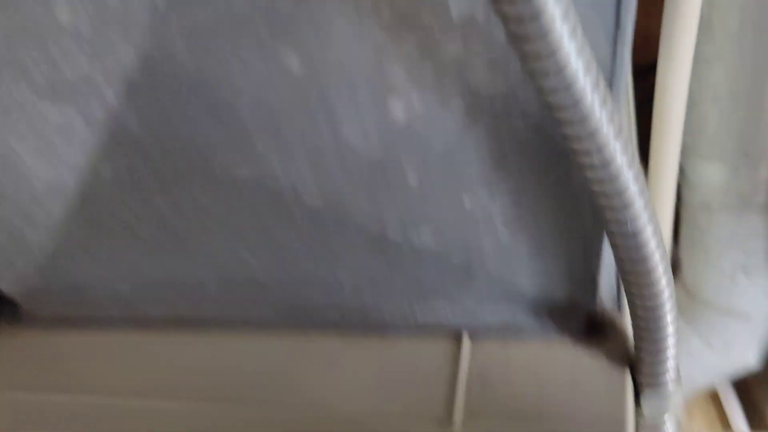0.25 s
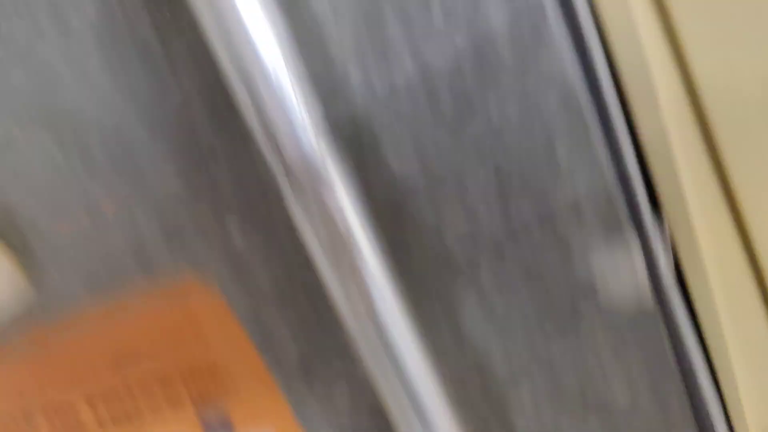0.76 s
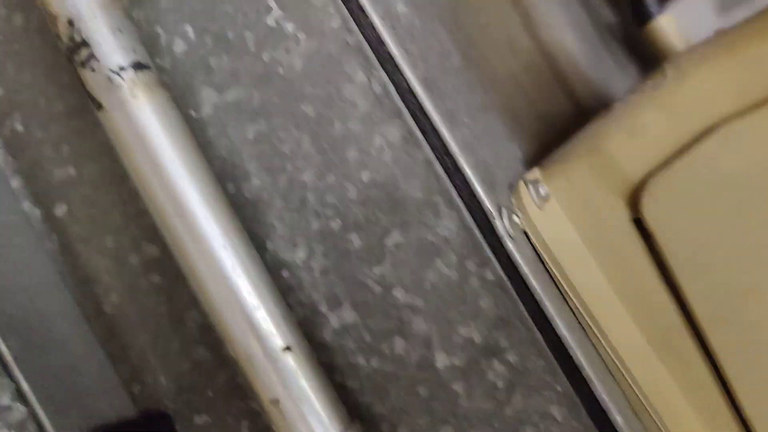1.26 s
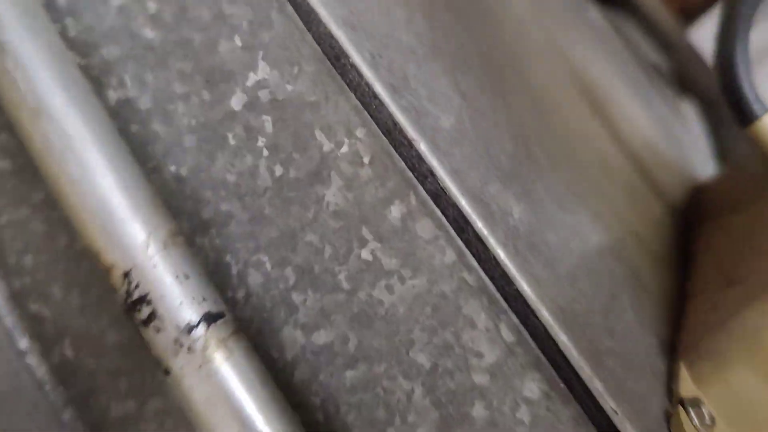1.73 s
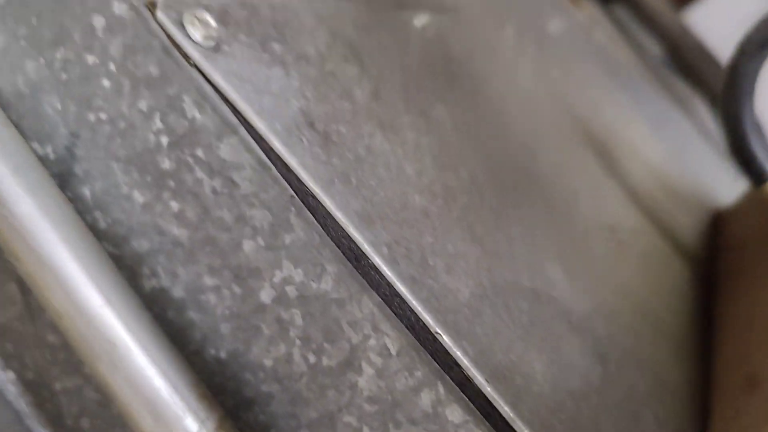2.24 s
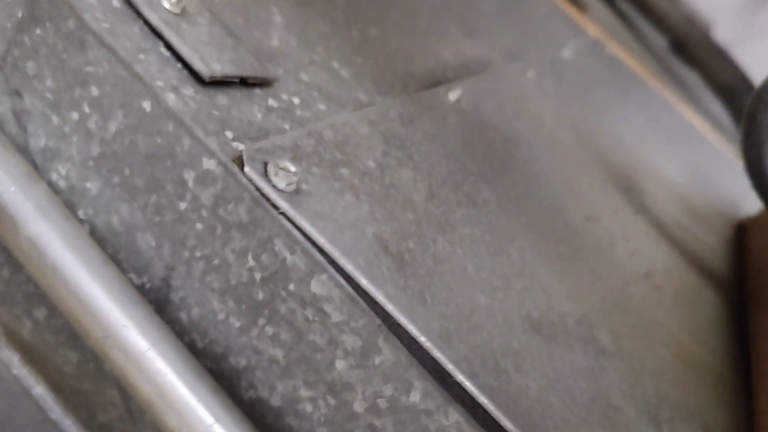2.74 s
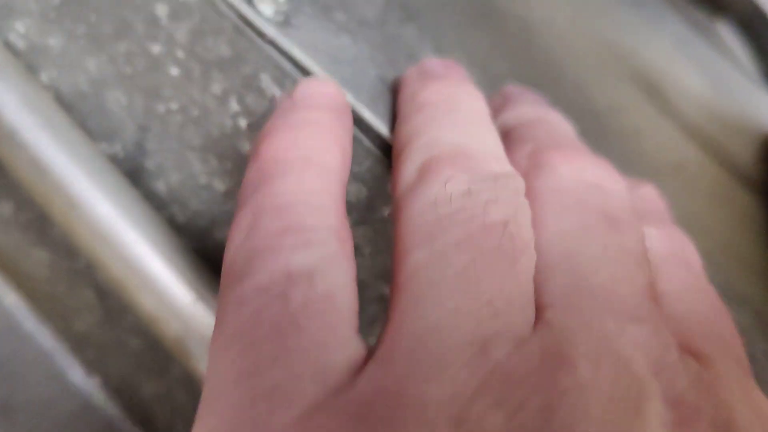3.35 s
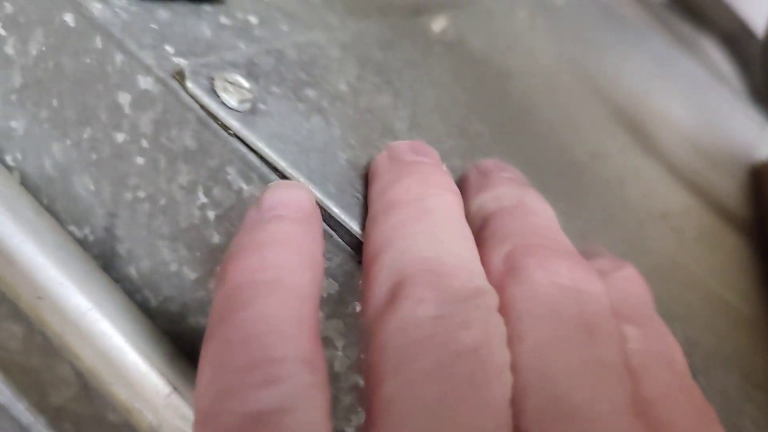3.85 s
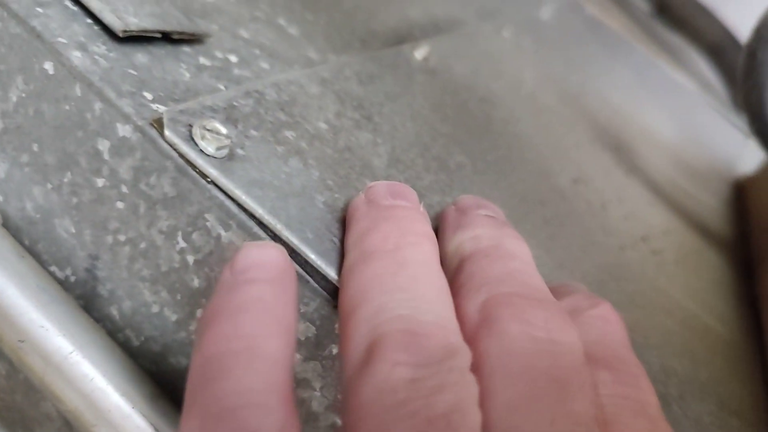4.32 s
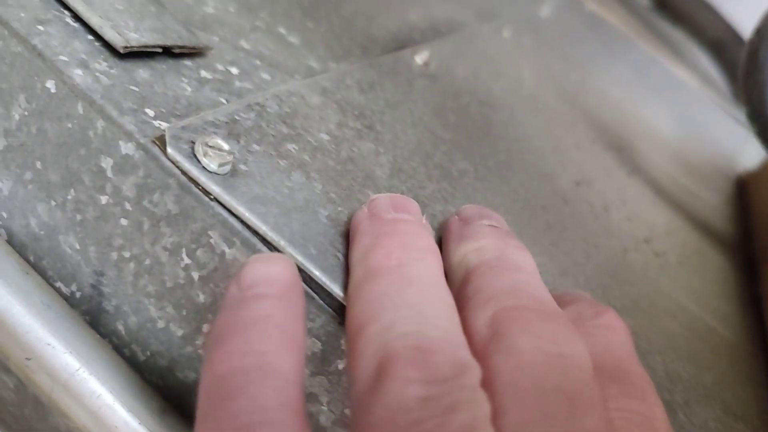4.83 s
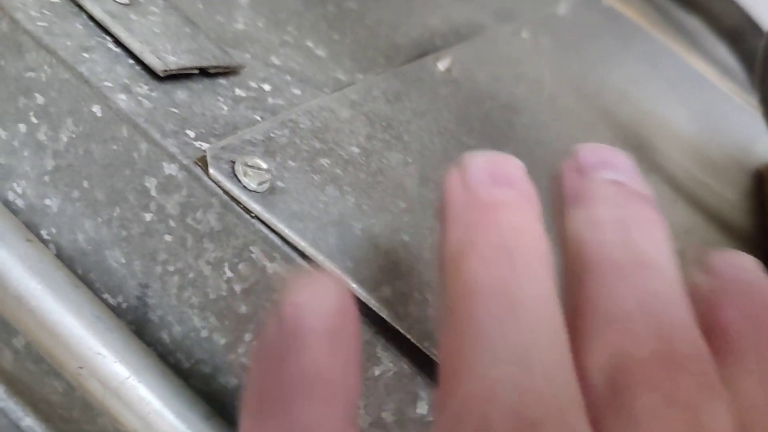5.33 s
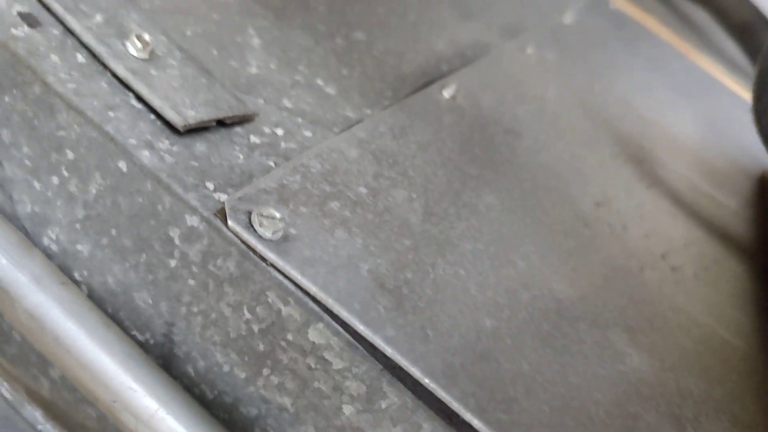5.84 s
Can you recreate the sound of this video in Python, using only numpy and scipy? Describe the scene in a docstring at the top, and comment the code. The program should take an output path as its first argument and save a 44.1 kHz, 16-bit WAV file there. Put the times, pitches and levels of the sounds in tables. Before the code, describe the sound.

Steady low hum and rushing air from a furnace, with a light sheet-metal rattle that a hand presses still.

```python
"""Gas furnace with a loose duct panel

Indoors, close to a running blower: the motor hums, turbulent air drums on the metal walls and rushes
through the duct, with a few small ticks. In two seconds the microphone moves from the cabinet up to the
sheet-metal duct, where a loose panel rattles about eight times a second until a hand presses it still.
Near the end the hand slides off and the panel rattles twice more."""
import sys
import numpy as np
from scipy import signal
from scipy.fft import rfft, irfft
from scipy.io import wavfile
from scipy.ndimage import uniform_filter1d

SR = 44100
rng = np.random.default_rng(int(sys.argv[2]) if len(sys.argv) > 2 else 0)


def dump_mix(stems):
    """Bounce the given channels to the path in sys.argv[1] as a 16-bit WAV at rate SR."""
    frames = np.atleast_2d(stems).T  # one column per channel
    limited = np.clip(frames, -1, 1)  # hard clip at full scale
    pcm = np.round(limited * 32767).astype(np.int16)
    wavfile.write(sys.argv[1], SR, pcm)


N = 268348
TIME = np.arange(N) / SR
LEAN_LEFT_DB = [[.35], [-.35]]
# the microphone's path: (time [s], position [0 at the cabinet, 1 at the duct])
MIC_PATH = [(0, 0.05), (.55, 0.12), (1.05, 0.35), (1.6, 0.76), (2, 1)]


def gain_of(db):
    """Decibels to amplitude."""
    return 10 ** (np.asarray(db) / 20)


def unit_rms(x):
    """Scales to unit rms."""
    return x / np.sqrt(np.mean(x ** 2) + 1e-20)


def spectrum_at(points, hz):
    """Reads a spectrum on a log-frequency axis."""
    f, value = np.transpose(points)
    return np.interp(np.log(hz + 1), np.log(f + 1), value)


def curve(rows):
    """A (time, value) table at every sample."""
    return np.interp(TIME, *np.transpose(rows))


def add(mix, start_s, sound):
    """Mixes a stereo sound in at start_s."""
    part = mix[:, max(round(start_s * SR), 0):][:, :sound.shape[1]]
    part += sound[:, :part.shape[1]]


def noise(colour, size=N):
    """Stereo noise whose spectrum is colour(hz) in dB; the bass reaches both sides alike."""
    # likeness of left and right at the microphone: (frequency [Hz], correlation [0-1])
    likeness = [(100, 0.99), (170, 0.92), (260, 0.78), (420, 0.84), (520, .35), (690, .08), (850, .28),
                (1100, .12), (1700, 0.42), (2100, 0.57), (2600, 0), (5000, 0.19), (7500, .25), (9500, 0.95),
                (15000, .3)]
    hz = np.fft.rfftfreq(size, 1 / SR)
    mid, side = rfft(rng.standard_normal((2, size)))
    same = spectrum_at(likeness, hz)
    side *= np.sqrt((1 - same) / (1 + same))
    x = irfft(np.array([mid + side, mid - side]) * gain_of(colour(hz)), size)
    return x / np.sqrt(np.mean(x.mean(0) ** 2))


def resonance(centre_hz, octaves, size):
    """Noise gathered round one resonance."""
    return noise(lambda hz: -20 * np.log10(1 + (np.log2((hz + 1) / centre_hz) / octaves) ** 2), size)


def steadied(x, span_s):
    """Evens out swells slower than span_s."""
    return x / np.sqrt(uniform_filter1d(x.mean(0) ** 2, max(int(span_s * SR), 2)) + 1e-9)


def wander(slow_hz, fast_hz, count):
    """A random waver of unit rms, summed from slow sines."""
    rates = np.geomspace(slow_hz, fast_hz, count)
    return unit_rms(sum(np.sin(2 * np.pi * (hz * TIME + rng.random())) for hz in rates))


def grain(size, span_samples):
    """Fine random roughness of unit rms."""
    return unit_rms(uniform_filter1d(rng.standard_normal(size), span_samples))


def along_path(cabinet, duct):
    """Blends what is heard at the two places as the microphone travels."""
    place = curve(MIC_PATH)
    return np.sqrt(1 - place) * cabinet + np.sqrt(place) * duct


def motor_hum(hum_hz=120, level_db=-23.5, midway_db=-0.7, waver_db=0.9, lag_rad=1.32):
    """The motor hums at twice the mains frequency; the wave is weaker midway and lags at the duct."""
    place = curve(MIC_PATH)
    db = level_db + midway_db * np.sin(np.pi * place) + waver_db * wander(.7, 8, count=12)
    wave = np.sin(2 * np.pi * hum_hz * TIME - lag_rad * place)
    return gain_of(db) * wave * gain_of(LEAN_LEFT_DB)


def wall_rumble(buffet_db=1.1):
    """Turbulent air makes the big metal walls drum in random surges."""
    # rumble beside the cabinet and at the duct: (frequency [Hz], level [dB])
    cabinet_spectrum = [(12, -30), (26, -23), (36, -15), (44, -7), (57, -1), (70, 0), (79, -6), (95, -1),
                        (108, -13), (135, -12), (170, -22), (420, -120)]
    duct_spectrum = [(12, -33), (22, -32), (33, -14), (38, -16), (52, -5.5), (68, -1.5), (80, -4.5),
                     (98, 0), (111, -11), (129, -7), (155, -11), (175, -22), (400, -120)]
    # slow swells of the rumble: (time [s], level [dB])
    swells = [(0, -22), (.35, -29.5), (.95, -30), (1.3, -25.5), (1.7, -27), (2.05, -22.5), (2.5, -23.5),
              (3.4, -24), (4.3, -25.5), (4.7, -23), (5.7, -26.5), (6.08, -22)]
    cabinet = steadied(noise(lambda hz: spectrum_at(cabinet_spectrum, hz)), span_s=0.18)
    duct = steadied(noise(lambda hz: spectrum_at(duct_spectrum, hz)), span_s=0.18)
    return along_path(cabinet, duct) * gain_of(curve(swells) + buffet_db * wander(2, 8, count=20))


def air_rush(duct_db=-39.5):
    """Air rushes through the cabinet and excites the resonances of the duct."""
    # the rush beside the cabinet and at the duct: (frequency [Hz], level [dB])
    cabinet_spectrum = [(90, -32), (150, -4), (210, 1), (300, -8), (400, -11), (520, -12.5), (660, -18.5),
                        (830, -19.5), (1150, -24), (1500, -25.5), (2050, -25.5), (2700, -36), (4000, -65)]
    duct_spectrum = [(130, -42.5), (180, -0.5), (225, -0.5), (255, -6.5), (305, -14.5), (375, -7),
                     (560, -13.5), (680, -21.5), (850, -18), (1000, -22.5), (1400, -24), (1850, -23),
                     (2250, -29), (2800, -39), (4000, -69)]
    # its strength beside the cabinet: (time [s], level [dB])
    cabinet_level = [(0, -34), (.2, -37), (.5, -35.5), (.85, -37.5), (1.2, -37.5)]
    # air resonances inside the duct: (frequency [Hz], width [Hz], lift [dB])
    duct_modes = [(194, 140, 1.5), (284, 31, 7), (355, 42, 0), (383, 18, 4), (449, 5.6, 2.5), (428, 22, 2),
                  (480, 12, 1.5), (584, 21, 8.5), (779, 14, 4), (844, 12, 6), (1117, 55, 3.5),
                  (1780, 190, 0.5), (2143, 19, 0.5)]

    def duct_colour(hz):
        peaks = sum(db / (1 + (2 * (hz - f) / width) ** 2) for f, width, db in duct_modes)
        return spectrum_at(duct_spectrum, hz) + peaks

    cabinet = gain_of(curve(cabinet_level)) * noise(lambda hz: spectrum_at(cabinet_spectrum, hz))
    return along_path(cabinet, gain_of(duct_db) * noise(duct_colour))


def seam_hiss(cabinet_db=-62.5, duct_db=-64.5, lift_db=3):
    """Air hisses at the seams, more brightly beside the cabinet."""
    # the hiss: (frequency [Hz], level [dB])
    spectrum = [(1500, -25), (2500, -2), (3100, 3), (4700, 0), (4950, -4), (7000, -12.5), (10000, -11),
                (15800, -10)]
    lift = [(3200, 0), (4500, lift_db), (7500, lift_db), (13000, 0)]
    cabinet = gain_of(cabinet_db) * noise(lambda hz: spectrum_at(spectrum, hz) + spectrum_at(lift, hz))
    duct = gain_of(duct_db) * noise(lambda hz: spectrum_at(spectrum, hz))
    return along_path(cabinet, duct) * gain_of(LEAN_LEFT_DB)


def hand_brushes(grain_db=2, pivot_hz=7000):
    """Skin and sleeve brush near the metal in short strokes of grainy friction."""
    # strokes: (start [s], rise [s], fall [s], level [dB], tilt [dB per octave])
    strokes = [(.071, 0.0028, 0.055, -55.5, 2), (.31, 0.0083, 0.2, -61.5, 1),
               (0.673, .004, 0.045, -55, -0.5), (2.37, 0.032, .1, -60, 2.5), (2.56, 0.091, 0.35, -64, 7.5),
               (2.85, 0.43, 0.17, -65.5, 6), (3.24, .03, 0.16, -60, 2.5), (5.395, .02, 0.047, -60, 5),
               (5.668, 0.025, 0.1, -53, 7)]
    # rubbing skin: (frequency [Hz], level [dB])
    skin = [(1500, -3.5), (3500, 3), (6800, -2.5), (10000, -4), (16000, -5.5)]
    out, t = np.zeros((2, N)), np.arange(SR // 2) / SR
    for start, rise, fall, db, tilt in strokes:
        rub = noise(lambda hz: spectrum_at(skin, hz) + tilt * np.log2(hz / pivot_hz + .1), len(t))
        envelope = np.interp(t, [0, rise, rise + fall], [0, 1, 0])
        add(out, start, rub * envelope * gain_of(db + grain_db * grain(len(t), span_samples=150)))
    return out


def snaps(events, modes, tail_db=-22, tail_t60=0.16):
    """Tiny snaps ring briefly in a few broad resonances and leave a faint tail."""
    out, t = np.zeros((2, N)), np.arange(SR // 10) / SR
    for start, db in events:
        for centre_hz, mode_db, t60, octaves in modes:
            decay = gain_of(-60 * t / t60) + gain_of(tail_db - 60 * t / tail_t60)
            ring = steadied(resonance(centre_hz, octaves, len(t)), t60 / 2)
            add(out, start, gain_of(db + mode_db) * decay * ring)
    return out


def metal_ticks():
    """Thin metallic ticks, all ringing on one note."""
    # ticks: (time [s], level [dB])
    ticks = [(.1127, -55), (.286, -41.5), (3.4956, -57), (4.464, -52.5)]
    # their ring: (frequency [Hz], level [dB], t60 [s], width [octaves])
    modes = [(4290, -0.5, 0.02, .11), (5500, -18, .008, .5)]
    return snaps(ticks, modes)


def dry_clicks():
    """Two small dry clicks, ringing lower than the ticks."""
    # clicks: (time [s], level [dB])
    clicks = [(1.1485, -50.5), (6.057, -62)]
    # their ring: (frequency [Hz], level [dB], t60 [s], width [octaves])
    modes = [(2290, 6.5, 0.022, 0.093), (4570, 1, 0.016, .08), (7500, -1, .018, .25)]
    return snaps(clicks, modes)


def mode_cluster(t, centre_hz, db, t60, octaves=0.059):
    """A group of close modes, beating as they die away."""
    return gain_of(db - 60 * t / t60) * resonance(centre_hz, octaves, len(t))


def panel_rattle(chatter_db=1.0, rise_s=0.00044, grain_db=1.5, room_db=-14.0, room_t60=0.49):
    """Each shake sets the panel edge chattering on its seam; the sheet rings on and the room trails it."""
    # shakes of the loose panel: (time [s], level [dB], t60 [s])
    shakes = [(1.5182, -56, 0.082), (1.635, -47, 0.047), (1.7584, -46.5, .065), (1.876, -44.5, 0.074),
              (1.9971, -48, .06), (2.1177, -53, 0.079), (2.238, -47.5, .08), (2.3565, -48.5, .1),
              (2.479, -49, 0.072), (2.721, -49, 0.1), (2.838, -53, 0.14), (2.9651, -59.5, .07),
              (3.082, -64, 0.076), (5.5005, -53.5, 0.044), (5.983, -56.5, 0.041)]
    # tiny contacts of the metal edge: (frequency [Hz], level [dB])
    spectrum = [(500, -22), (1300, 3), (2200, 2), (3000, -4), (3900, -2), (5400, 1), (7000, -1.5),
                (9000, -3), (12000, -4.5), (16000, -6)]
    # clang of the broad sheet, singing of its stiff edge: (frequency [Hz], level [dB], t60 [s])
    sheet_modes = [(798, 1.5, 0.15), (1077, 2, 0.17), (1353, 1, 0.25), (1560, -1, 0.19), (1764, 2.5, 0.14),
                   (2154, -7, 0.86)]
    edge_mode = (6880, -23, .6)
    turn_s = (2.145, 2.295)  # the microphone comes round to face the seam
    out, t = np.zeros((2, N)), np.arange(SR // 2) / SR
    attack = 1 - np.exp(-t / rise_s)
    room_tail = gain_of(room_db - 60 * t / room_t60)
    for start, db, t60 in shakes:
        # facing the seam: brighter chatter, more clang, less singing
        treble = [(7000, 0), (10000, np.interp(start, turn_s, [-2, 2]))]
        clang_db = np.interp(start, turn_s, [-7, -3.5])
        singing_db = np.interp(start, turn_s, [-3.5, -10])
        contacts = unit_rms(gain_of(grain_db * grain(len(t), span_samples=20)))
        decay = np.hypot(contacts * gain_of(-60 * t / t60), room_tail)
        chatter = decay * noise(lambda hz: spectrum_at(spectrum, hz) + spectrum_at(treble, hz), len(t))
        clang = gain_of(clang_db) * sum(mode_cluster(t, *mode) for mode in sheet_modes)
        singing = gain_of(singing_db) * mode_cluster(t, *edge_mode)
        add(out, start, gain_of(db) * attack * (gain_of(chatter_db) * chatter + clang + singing))
    return out


def wall_reflections(x, echo_db=-16, count=14, low_cut_hz=700):
    """Nearby metal walls return the treble within milliseconds, rippling its spectrum."""
    taps = np.zeros(SR // 60)
    taps[rng.integers(SR // 500, len(taps), count)] = rng.choice([-1., 1.], count) / np.sqrt(count)
    taps = signal.sosfilt(signal.butter(2, low_cut_hz, "high", fs=SR, output="sos"), taps)
    return x + gain_of(echo_db) * signal.oaconvolve(x, taps[None], axes=1)[:, :N]


def scene():
    """The running furnace and its small metal noises, from close by."""
    drone = motor_hum() + wall_rumble()
    air_and_panel = air_rush() + seam_hiss() + panel_rattle() + hand_brushes()
    return drone + wall_reflections(air_and_panel) + metal_ticks() + dry_clicks()


def record(dry, band_limit_hz=15830):
    """The microphone's uneven treble, then a steep band limit."""
    # microphone response: (frequency [Hz], gain [dB])
    response = [(5000, -0.5), (5600, 0), (6800, 7.5), (7600, 1.5), (8600, -6), (10000, -3), (11700, -8),
                (14000, -1), (15800, -4.5)]
    hz = np.fft.rfftfreq(N, 1 / SR)
    coloured = irfft(rfft(dry) * gain_of(spectrum_at(response, hz)), N)
    low_pass = signal.firwin(1023, band_limit_hz, window=("kaiser", 9), fs=SR)
    return signal.oaconvolve(coloured, low_pass[None], "same")


dry = scene()
out = record(dry)
dump_mix(out)
```